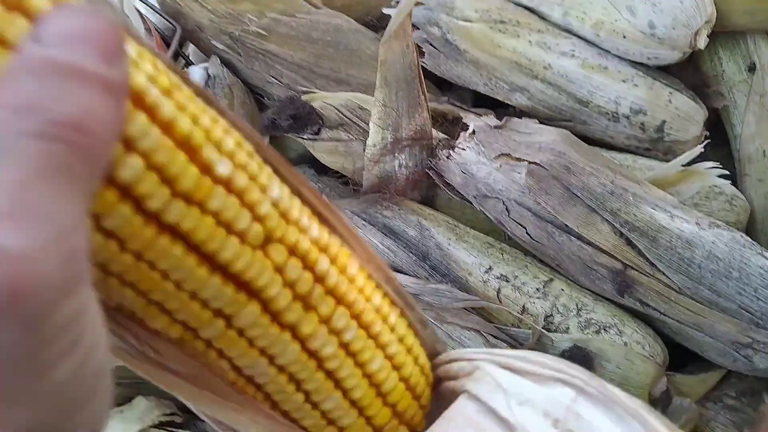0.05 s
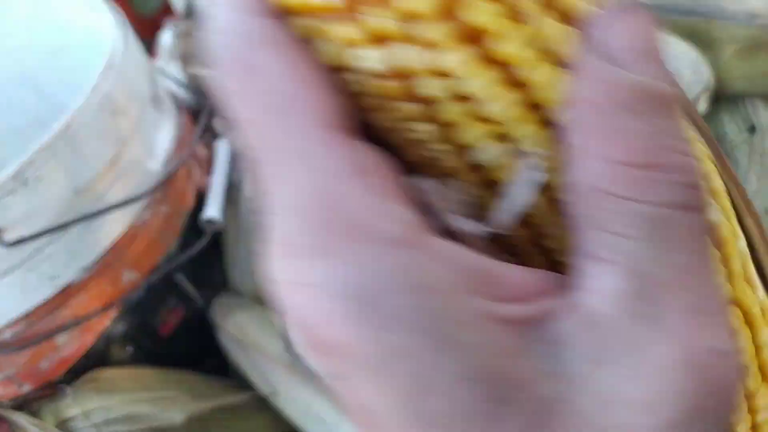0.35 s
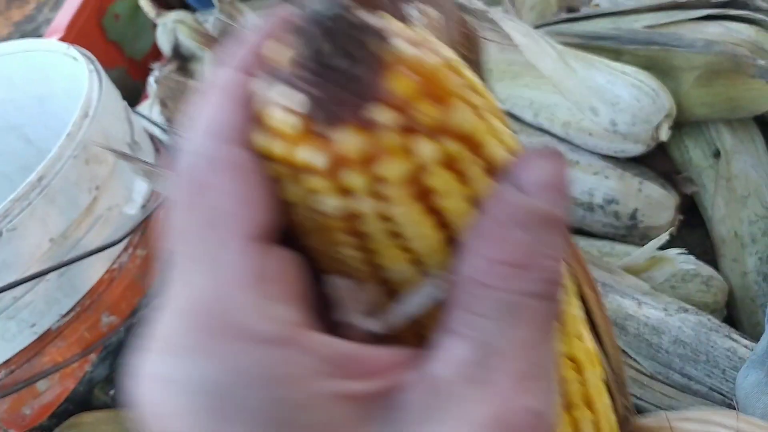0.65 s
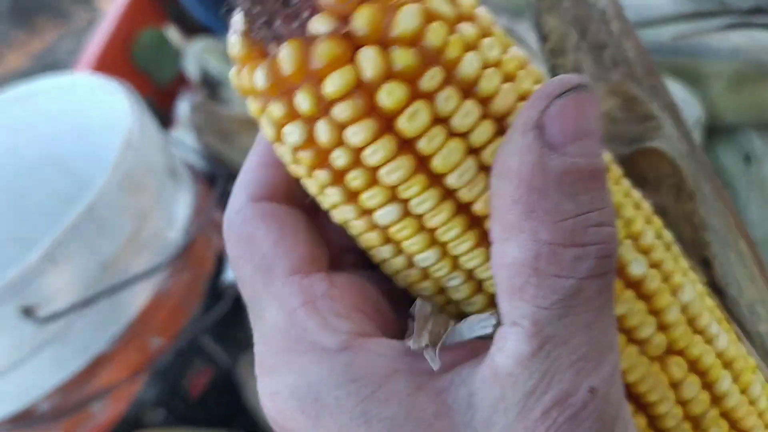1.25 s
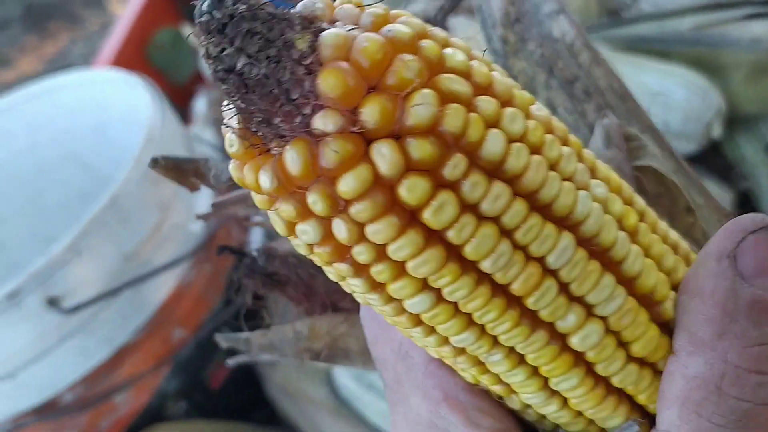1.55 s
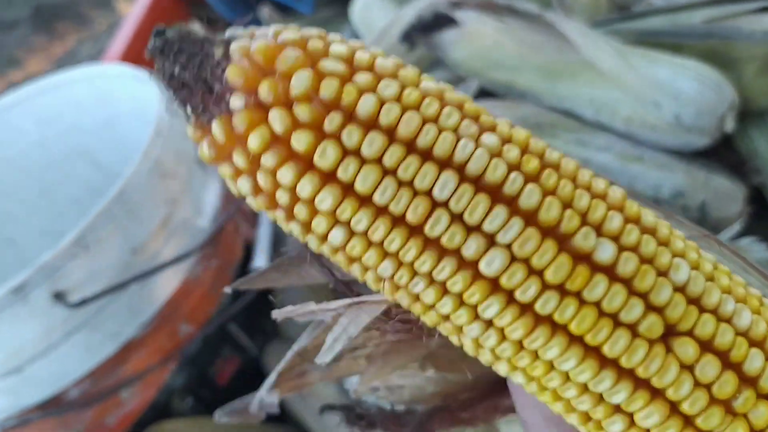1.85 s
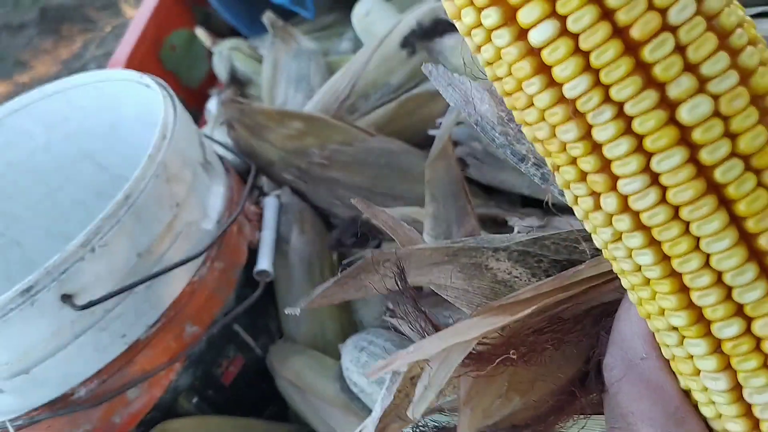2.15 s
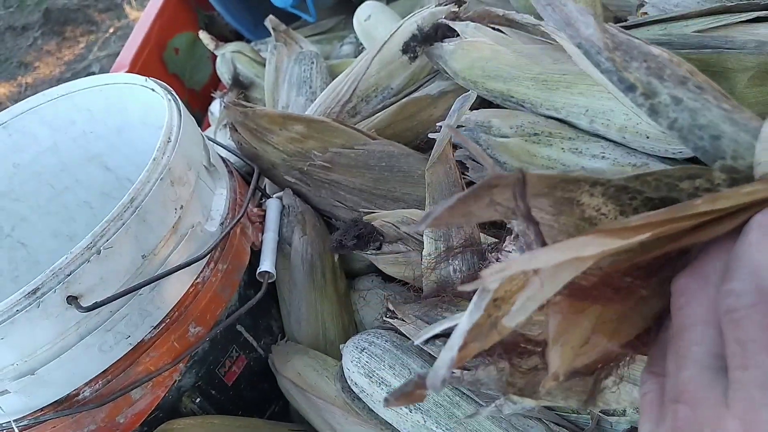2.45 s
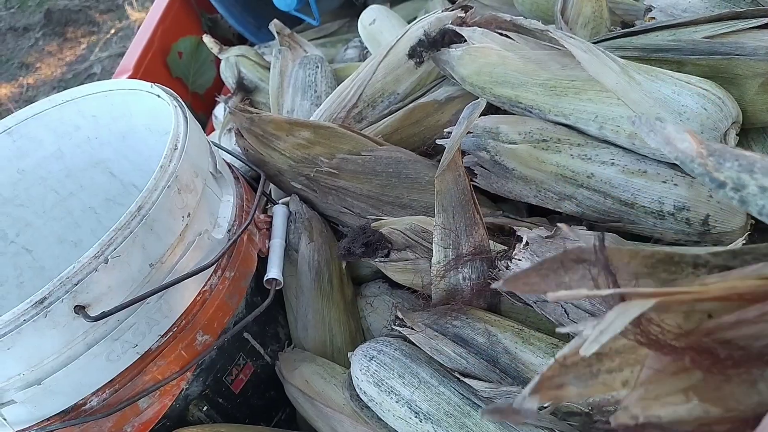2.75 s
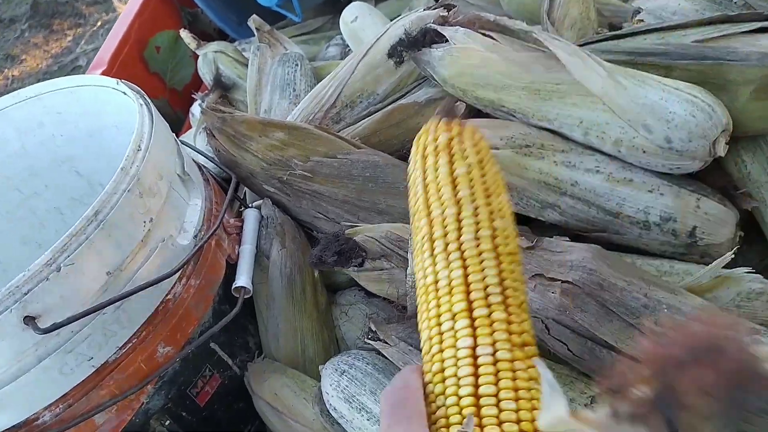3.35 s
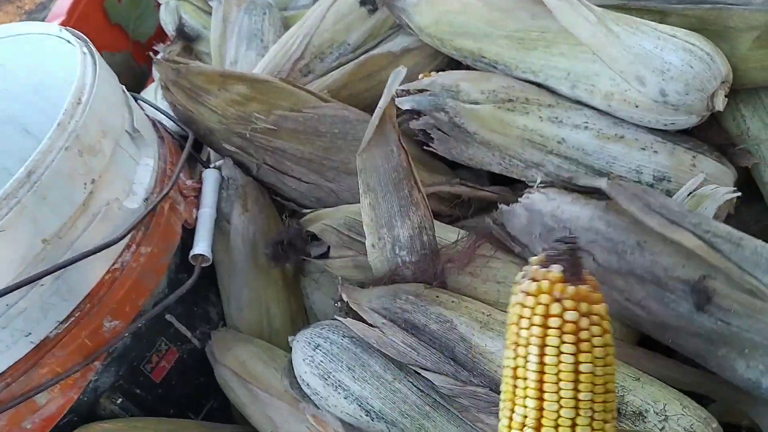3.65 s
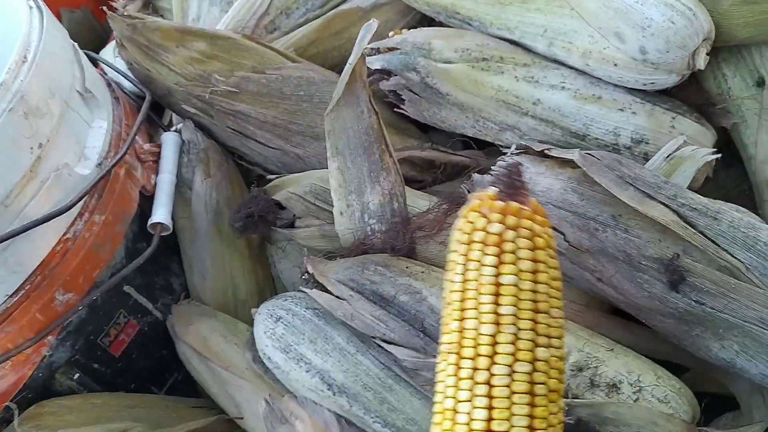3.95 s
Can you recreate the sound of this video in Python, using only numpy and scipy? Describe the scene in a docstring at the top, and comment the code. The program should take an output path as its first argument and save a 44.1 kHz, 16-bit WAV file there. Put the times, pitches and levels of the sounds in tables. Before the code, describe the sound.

Papery rustling and crackling comes from a corn husk being stripped up close outdoors. It starts briskly, eases, then builds again with snapping fibres and brief tears, ending in a strong burst as a light breeze brushes the microphone.

```python
"""Outdoors, over a heap of maize ears, a hand strips the dry husk from one ear, close by.
Leaves slide in strokes of tiny slips and crackle as they crease. Stiff fibres snap, leaves tear,
cupped leaves buckle with hollow pops, and the cob bumps in the hand. The cob and the heap throw back
short reflections. Underneath, light air moves on the two ports of the microphone."""
import sys
import numpy as np
from scipy import signal
from scipy.io import wavfile

SR = 44100
rng = np.random.default_rng(int(sys.argv[2]) if len(sys.argv) > 2 else 0)


def master(y):
    """Save y as 16-bit WAV."""
    cut = np.clip(np.atleast_2d(y).T, -1, 1)
    pcm = np.round(cut * 32767)  # scale
    wavfile.write(sys.argv[1], SR, pcm.astype(np.int16))


N = 176400
TIME = np.arange(N) / SR
BODY_PAN_DB = -2  # every pan is left level minus right level


# The hand's strokes, as two fader rides: time_s, slide_level_db, flutter_level_db
HAND_STROKES = [(0.0, -36, -64), (0.056, -30, -43.5), (0.176, -23, -42), (0.223, -27.5, -45.5),
                (0.247, -25.5, -36), (0.311, -31, -63), (0.331, -26, -53), (0.345, -31, -37.5),
                (0.362, -29.5, -51), (0.38, -23.5, -34.5), (0.415, -24.5, -48), (0.503, -21.5, -53),
                (0.583, -29.5, -63), (0.615, -52, -65), (0.67, -29, -48), (0.73, -40.5, -58.5),
                (0.77, -52, -46.5), (0.83, -30.5, -54.5), (0.852, -53, -58), (0.91, -38.5, -59),
                (0.998, -43.5, -52.5), (1.014, -32, -46), (1.078, -46.5, -64.5), (1.157, -43, -56.5),
                (1.221, -33.5, -52.5), (1.285, -30.5, -49.5), (1.317, -38.5, -51), (1.349, -30, -46.5),
                (1.413, -33.5, -42.5), (1.477, -34.5, -43.5), (1.556, -34, -52), (1.735, -25.5, -34),
                (1.78, -25.5, -38.5), (1.836, -39.5, -55), (1.9, -30.5, -49), (1.987, -30.5, -49.5),
                (2.055, -37.5, -45), (2.123, -35.5, -56), (2.187, -26, -52), (2.23, -29.5, -42),
                (2.243, -41, -52.5), (2.3, -37.5, -51), (2.39, -29.5, -40.5), (2.554, -36.5, -46.5),
                (2.615, -27.5, -42.5), (2.665, -29, -46), (2.722, -34.5, -58), (2.86, -25.5, -37.5),
                (2.9, -29.5, -46), (3.081, -35.5, -50.5), (3.129, -30.5, -49), (3.217, -40.5, -59),
                (3.252, -51, -67), (3.27, -34.5, -52), (3.289, -62, -60), (3.314, -38, -65),
                (3.33, -55, -58), (3.405, -46, -65), (3.445, -31.5, -48), (3.48, -20, -31.5),
                (3.528, -26, -43), (3.584, -26.5, -43), (3.62, -21, -32), (3.712, -26.5, -41),
                (3.77, -27.5, -38.5), (3.83, -36.5, -46.5), (3.919, -27, -36.5), (3.943, -33, -50.5),
                (3.999, -29.5, -45.5)]
# Papery hiss of leaf on leaf: frequency_hz, level_db
SLIP_TONE = [(150, -18.5), (600, -12.5), (1300, -5.5), (2300, -1.5), (4200, -1.5), (6500, -6.5), (9300, 3),
             (12000, -18), (15500, -14)]
# Crisp edge of a crease: frequency_hz, level_db
CREASE_TONE = [(150, -7), (700, -4.5), (2400, 4.5), (5000, 0.5), (9200, 6.5), (12000, -20), (15500, -6)]
# Hollow body of the husk, also heard in the pops: frequency_hz, level_db
BODY_TONE = [(70, -48), (120, -19.5), (165, -2.5), (330, 1.5), (560, -2), (900, -1.5), (1500, -1.5),
             (3000, -18)]

def sliding_leaves():
    """Leaves rub in a hiss of dense slips and sparser creases while the whole husk flutters."""
    slide_db, flutter_db = in_time(HAND_STROKES)
    judder_db = 2.5 * drift(rate_hz=58.6)
    effort = from_db(slide_db)
    slipping = effort * grains(per_s=9900, spread_db=-1, decay_s=0.00025)
    slips = from_db(-4.5) * coloured(slipping, SLIP_TONE, flicker_db=3)
    creasing = effort * grains(per_s=130, spread_db=2.2, decay_s=0.00048)
    creases = from_db(-10) * coloured(creasing, CREASE_TONE, flicker_db=1.5)
    shaking = from_db(flutter_db + 2.5 + judder_db) * grains(per_s=1200, spread_db=4, decay_s=0.00092)
    flutter = coloured(shaking, BODY_TONE, flicker_db=1.5)
    return slips + creases + pan(BODY_PAN_DB) * flutter


# Sharp accents of breaking fibres: peak_s, level_db, length_s, pan_db
FIBRE_SNAPS = [(.0546, -22, .0025, -3), (.241, -16, .0025, -1), (.2485, -20, .0025, 0),
               (.2529, -21, .0021, 0), (.298, -19, .005, -1), (.3498, -15, .0018, -2),
               (.353, -20, .0016, -3), (.3815, -21, .0015, -5), (.4134, -21, .0015, -5),
               (.7425, -28, .008, -6), (.7744, -32, .005, -3), (.8712, -30, .002, -1),
               (1.0013, -33, .001, 0), (1.016, -30, .004, -5), (1.3512, -23, .002, 2),
               (1.7708, -22, .002, 0), (1.9095, -19, .0018, 3), (1.9692, -24, .0015, 0),
               (2.06, -22.5, .0026, -3), (2.158, -21, .0022, -1), (2.1835, -16, .003, 1),
               (2.1885, -21, .002, 0), (2.2272, -21.5, .0026, -3), (2.2634, -31, .003, -2),
               (2.2783, -24.5, .0025, -1), (2.3271, -28, .0016, 0), (2.3695, -23, .0014, -4),
               (2.6228, -13.5, .0028, 1), (2.6326, -17, .0018, 4), (2.656, -19, .0016, -5),
               (2.7435, -19.5, .0015, 0), (2.8244, -16, .0013, -3), (2.882, -22, .004, 4),
               (2.9007, -23, .0013, 5), (3.2247, -23.5, .0015, 1), (3.235, -34, .003, 2),
               (3.2685, -33, .007, -3), (3.303, -30, .0016, -2), (3.3165, -28, .0023, -10),
               (3.406, -25.5, .0013, 0), (3.476, -21, .008, -3), (3.5221, -19, .0016, 1),
               (3.5929, -14, .0016, -5), (3.6073, -15, .002, -3), (3.6538, -20, .002, -6)]
# Brittle top of a snap: frequency_hz, level_db
SNAP_TONE = [(150, -8), (700, -6), (2400, 1), (5000, 2.5), (7000, -1.5), (9200, 7), (12000, -13),
             (15500, -5)]

def snapping_fibres():
    """A fibre gives way: a sharp tick inside a burst of a few milliseconds, then the leaf shivers."""
    rise_share, shiver_decay_s, tick_decay_s, trim_db = 0.2, 0.008, 0.00022, -2.5
    power = np.zeros((2, N))
    for peak_s, level_db, length_s, pan_db in FIBRE_SNAPS:
        t = since(peak_s)
        rise_s = length_s * rise_share
        attack = np.exp(np.minimum(TIME - peak_s, 0) / rise_s)
        release = np.exp(-t / (length_s - rise_s))
        shiver = from_db(-28) ** 2 * np.exp(-t / shiver_decay_s)
        tick = from_db(3) ** 2 * np.exp(-np.abs(TIME - peak_s) / tick_decay_s)
        power += (pan(pan_db) * from_db(level_db + trim_db)) ** 2 * (attack * (release + shiver) + tick)
    return panned_bursts(power, SNAP_TONE)


# Rips that build to a hard stop: parting_s, level_db, swell_s, pan_db
LEAF_TEARS = [(.842, -28, .008, -2), (1.777, -25, .035, 0), (2.2355, -24, .0015, 5), (2.389, -23, .007, 5),
              (2.868, -17.5, .022, 0)]
# Thin, bright rasp of a rip: frequency_hz, level_db
TEAR_TONE = [(150, -15), (2400, -1.5), (9200, 6), (12000, -0.5), (15500, -6)]

def tearing_leaves():
    """A leaf tears along its veins: a grainy rip that swells and stops dead as the leaf parts."""
    release_s, trim_db = 0.0015, -1.5
    power = np.zeros((2, N))
    for parting_s, level_db, swell_s, pan_db in LEAF_TEARS:
        swell = np.exp(np.minimum(TIME - parting_s, 0) / swell_s)
        release = np.exp(-since(parting_s) / release_s)
        power += (pan(pan_db) * from_db(level_db + trim_db)) ** 2 * swell * release
    rasp = grains(per_s=3000, spread_db=0.83, decay_s=0.000071)
    return panned_bursts(power * rasp ** 2, TEAR_TONE)


# Hollow pops of cupped leaves: start_s, level_db, settled_pitch_hz
LEAF_POPS = [(.301, -21, 850), (.380, -27, 1300), (.540, -22, 900), (1.006, -28, 550), (1.352, -22, 800),
             (1.404, -26, 520), (1.451, -22, 850), (1.629, -23.5, 870), (1.773, -22, 950),
             (2.061, -31, 600), (2.388, -27, 550), (2.524, -27, 650), (2.601, -22, 850), (3.521, -18, 1600),
             (3.593, -17, 760)]

def buckling_leaves():
    """A buckling leaf rings for a few rough cycles, drops in pitch as it slackens and puffs out air."""
    rise_s, decay_s, trim_db = 0.0015, 0.0025, 5.5
    overshoot, sag_s = 1.15, 0.0018  # the pitch starts at (1 + overshoot) times its settled value
    ring, puff = np.zeros((2, N))
    roughness = 1 + 0.45 * drift(rate_hz=650)
    for start_s, level_db, pitch_hz in LEAF_POPS:
        t = since(start_s)
        cycles = pitch_hz * (t + overshoot * sag_s * (1 - np.exp(-t / sag_s)))
        attack = 1 - np.exp(-(t / rise_s) ** 2)
        envelope = from_db(level_db + trim_db) * attack * np.exp(-t / decay_s)
        ring += envelope * np.sin(2 * np.pi * cycles)
        puff += envelope * from_db(-4.5)
    return pan(BODY_PAN_DB) * (ring * roughness + coloured(puff, BODY_TONE, flicker_db=2))


# Soft low knocks of the cob: start_s, level_db, pitch_hz, t60_s
COB_BUMPS = [(0.262, -25, 248, 0.036), (0.999, -36, 332, 0.041), (2.504, -20, 274, 0.042),
             (2.523, -29.5, 155.6, 0.18), (2.659, -20, 300, 0.027), (3.476, -19, 205, 0.055)]

def bumping_cob():
    """Each contact with the hand sounds one damped low mode of the cob, well to the right."""
    rise_s = 0.0029
    knocks = np.zeros(N)
    for start_s, level_db, pitch_hz, t60_s in COB_BUMPS:
        t = since(start_s)
        envelope = (1 - np.exp(-t / rise_s)) * from_db(-60 * t / t60_s)
        knocks += from_db(level_db) * envelope * np.sin(2 * np.pi * pitch_hz * t)
    return pan(-13) * knocks


def cob_echo(sound):
    """A reflection off the moving cob lays a shifting comb over the sound, different at each port."""
    gain, delay_s, sway = 0.24, 0.001186, 0.217
    reflection = np.zeros((2, N))
    for port in range(2):
        lag_s = delay_s * np.exp(sway * drift(rate_hz=1.486))
        reflection[port] = np.interp(TIME - lag_s, TIME, sound[port])
    return (sound + gain * reflection) / np.hypot(1, gain)


def heap_scatter(sound):
    """The heap and a bucket scatter the sound back as a brief, dense tail."""
    gap_s, t60_s, return_db = 0.003, 0.045, -17.5
    t = TIME[:SR // 5]
    echoes = rng.standard_normal((2, len(t))) * from_db(-60 * t / t60_s) * (t > gap_s)
    echoes /= np.sqrt(np.sum(echoes ** 2, axis=1, keepdims=True))
    return from_db(return_db) * signal.fftconvolve(sound, echoes, axes=1)[:, :N]


# Fader ride of the breeze on the microphone: time_s, level_db
BREEZE_GUSTS = [(0, -51), (1.7, -52.5), (1.87, -46), (2.05, -51), (2.95, -48), (3.2, -52), (3.47, -38),
                (3.62, -49), (4, -48)]
# Soft outdoor bed: frequency_hz, level_db
AIR_TONE = [(100, -16), (300, -7), (1000, -8), (4000, -8), (15000, -60)]

def outdoor_air():
    """Breeze rumbles separately on each port, over a faint outdoor hiss."""
    breeze_db, = in_time(BREEZE_GUSTS)
    sub_bass = signal.butter(2, [4, 28.6], "band", fs=SR, output="sos")
    rumble = signal.sosfilt(sub_bass, rng.standard_normal((2, N + SR)))[:, SR:]
    breeze = from_db(breeze_db) * pan(-2.5) * unit_power(rumble)
    return breeze + from_db(-61) * coloured(1, AIR_TONE, flicker_db=3)


# Stereo width of the noise layers, wider where correlation is low: frequency_hz, correlation
STEREO_CORRELATION = [(40, 0.097), (200, 0.5), (700, 0.48), (2000, 0.07), (5000, 0.21), (14000, 0.14)]

def coloured(envelope, tone, flicker_db):
    """Stereo noise under an envelope, shaped to a tone in bands that each flicker in level."""
    edges = np.geomspace(20, 17000, 27)
    centres = np.sqrt(edges[1:] * edges[:-1])
    gains = from_db(at_hz(tone, centres))
    gains /= np.sqrt(np.sum(gains ** 2 * np.diff(edges)) / (SR / 2))
    # Neighbouring bands take turns between two independent mid/side pairs.
    noise = rng.standard_normal((2, 2, N)) * envelope + 1e-18
    out = np.zeros((2, N))
    for k, hz in enumerate(centres):
        bandpass = signal.butter(2, edges[k:k + 2], "band", fs=SR, output="sos")
        mid, side = signal.sosfilt(bandpass, noise[k % 2])
        alike = at_hz(STEREO_CORRELATION, hz)
        band = np.sqrt((1 + alike) / 2) * mid + np.sqrt((1 - alike) / 2) * side * [[1], [-1]]
        out += gains[k] * from_db(flicker_db * drift(rate_hz=17.4)) * band
    return out


def panned_bursts(power, tone):
    """Coloured noise that follows a power envelope at each port."""
    mean = power.mean(axis=0) + 1e-18
    return np.sqrt((power + 1e-18) / mean) * coloured(np.sqrt(mean), tone, flicker_db=0)


def grains(per_s, spread_db, decay_s):
    """Unit-power envelope of tiny random releases of uneven size, each swelling and dying quickly."""
    sizes = from_db(spread_db * np.minimum(rng.exponential(1, N), 3.5))
    power = (rng.random(N) < per_s / SR) * sizes ** 2
    pole = np.exp(-2 / (decay_s * SR))
    return unit_power(np.sqrt(signal.lfilter([1], [1, -2 * pole, pole ** 2], power + 1e-18)))


def drift(rate_hz):
    """Smooth random wander of unit power, rolling off above the given rate."""
    hop, warm_up = 40, 2000
    pole = np.exp(-2 * np.pi * rate_hz * hop / SR)
    noise = rng.standard_normal(N // hop + warm_up + 2)
    wander = signal.lfilter([1], [1, -2 * pole, pole ** 2], noise)[warm_up:]
    return np.interp(np.arange(N) / hop, np.arange(len(wander)), unit_power(wander))


def in_time(rows):
    """Each column of a fader ride, at every sample."""
    times_s, *columns = np.transpose(rows)
    return [np.interp(TIME, np.sort(times_s), column) for column in columns]


def at_hz(curve, hz):
    """Read a curve on a log-frequency axis."""
    frequencies_hz, values = np.transpose(curve)
    return np.interp(np.log(hz), np.log(frequencies_hz), values)


def pan(db):
    """Left and right gains of constant total power; positive leans left."""
    gains = from_db(np.array([[0.5], [-0.5]]) * db)
    return gains / np.sqrt(np.mean(gains ** 2, axis=0))


def since(start_s):
    """Seconds since a moment, zero before it."""
    return np.maximum(TIME - start_s, 0)


def from_db(db):
    """Decibels to gain."""
    return 10 ** (np.asarray(db) / 20)


def unit_power(x):
    """Scale to an RMS of one."""
    return x / np.sqrt(np.mean(x ** 2) + 1e-20)


# The husk's path across the stereo image: time_s, pan_db
HUSK_PATH = [(0, -1), (.8, -1), (1.4, -0.5), (2.45, 1.5), (3.1, 2), (3.55, -2), (4, -3)]

def scene():
    """The husk up front, reaching the left port slightly sooner, with scatter and air behind it."""
    left_lead_s = 0.00019
    pan_db, = in_time(HUSK_PATH)
    handling = cob_echo(sliding_leaves()) + buckling_leaves() + bumping_cob()
    breaking = cob_echo(snapping_fibres() + tearing_leaves())
    left, right = pan(pan_db) * handling + breaking
    husk = np.array([left, np.roll(right, round(left_lead_s * SR))])
    return husk + heap_scatter(husk) + outdoor_air()


# Peaks and dips of the microphone ports, left list then right: centre_hz, width_hz, gain_db
PORT_RESONANCES = [
    [(2200, 610, 7), (10300, 1600, -2.5), (14100, 1000, 2)],
    [(9110, 510, 6.5)],
]

def record(dry):
    """Each microphone port adds its own colour, then a steep filter cuts the very top."""
    channels = []
    for channel, resonances in zip(dry, PORT_RESONANCES):
        for centre_hz, width_hz, gain_db in resonances:
            peak = signal.iirpeak(centre_hz, centre_hz / width_hz, fs=SR)
            channel = channel + (from_db(gain_db) - 1) * signal.lfilter(*peak, channel)
        channels.append(channel)
    high_cut = signal.ellip(10, 0.2, 80, 15500, fs=SR, output="sos")
    return signal.sosfilt(high_cut, np.array(channels))


dry = scene()
out = record(dry)
master(out)
```